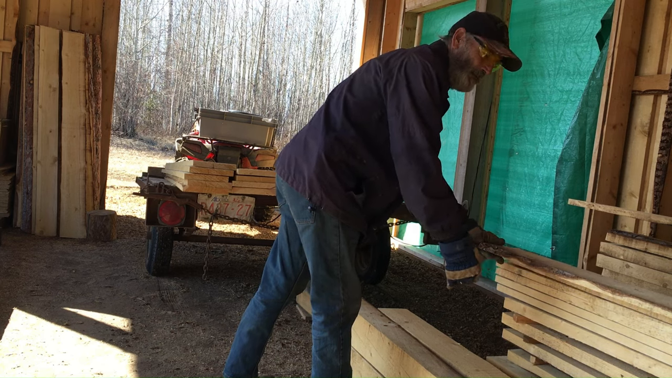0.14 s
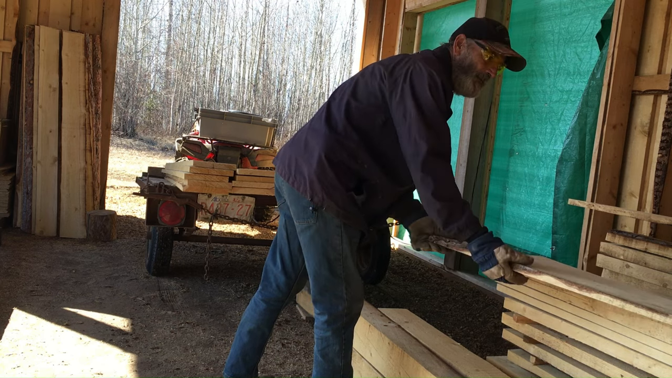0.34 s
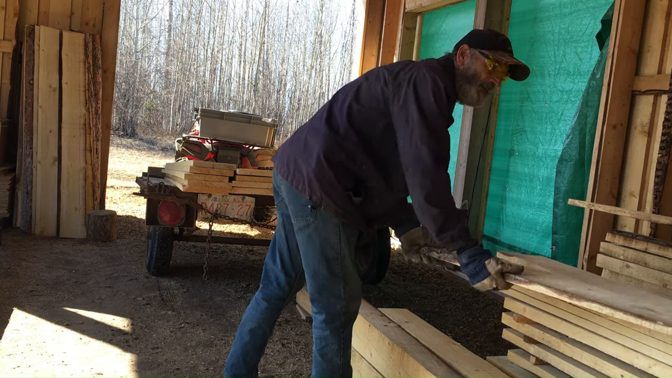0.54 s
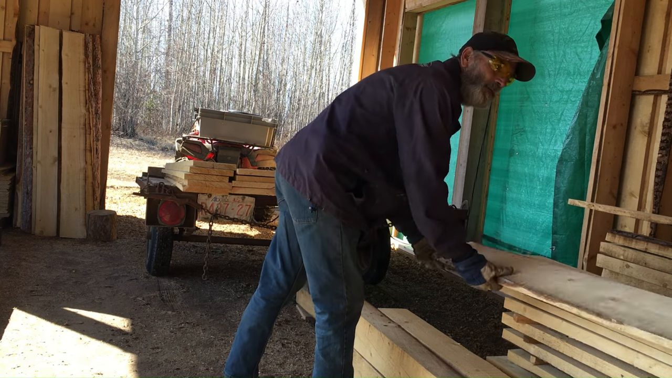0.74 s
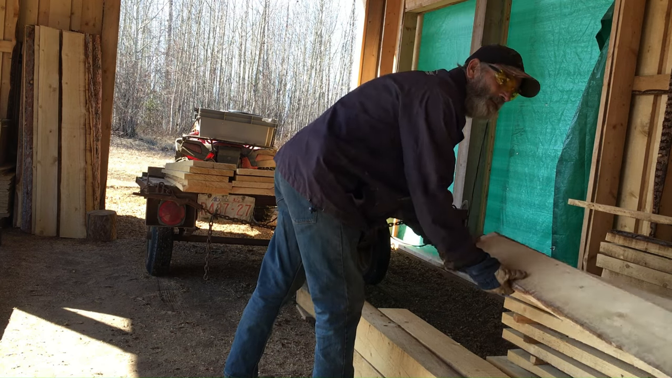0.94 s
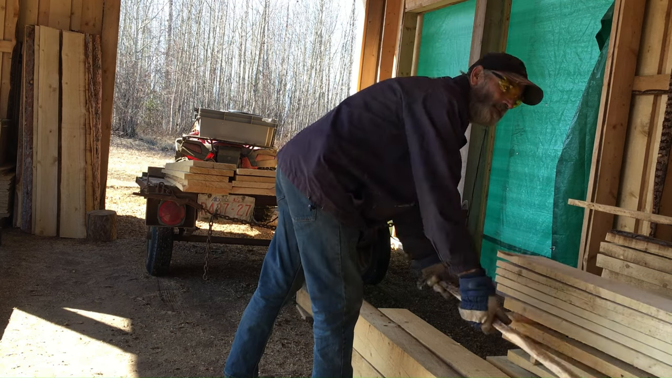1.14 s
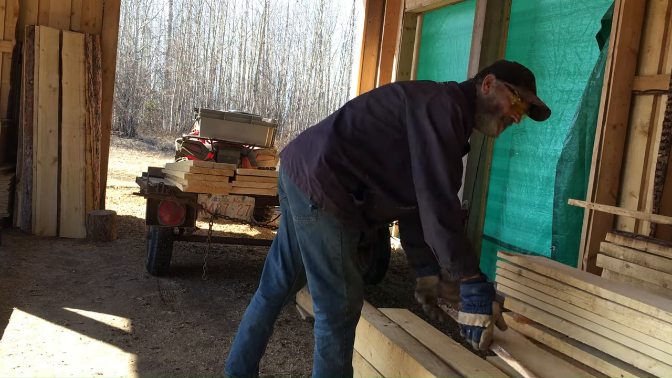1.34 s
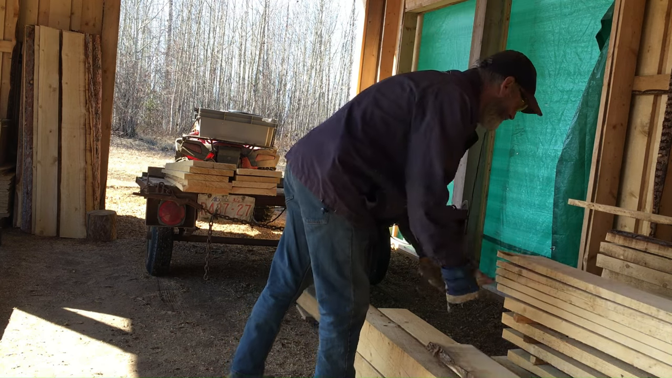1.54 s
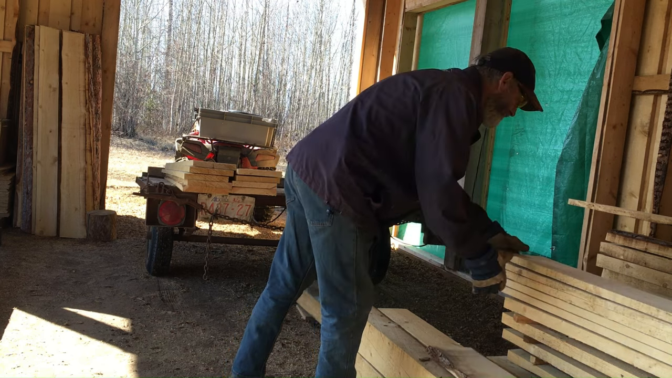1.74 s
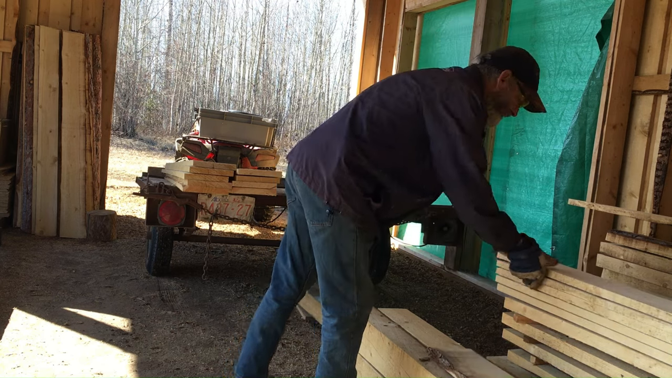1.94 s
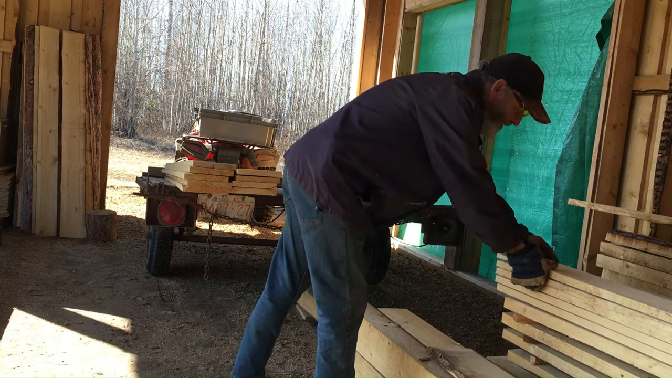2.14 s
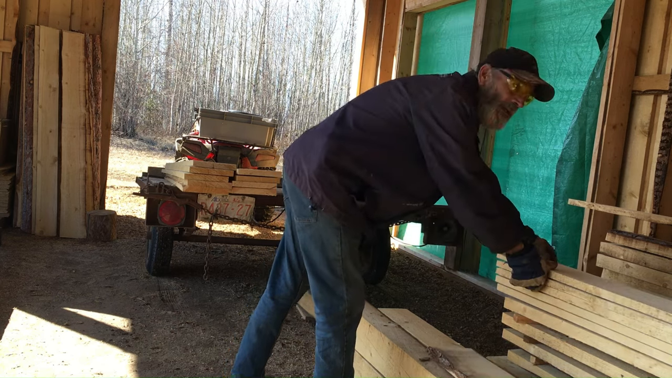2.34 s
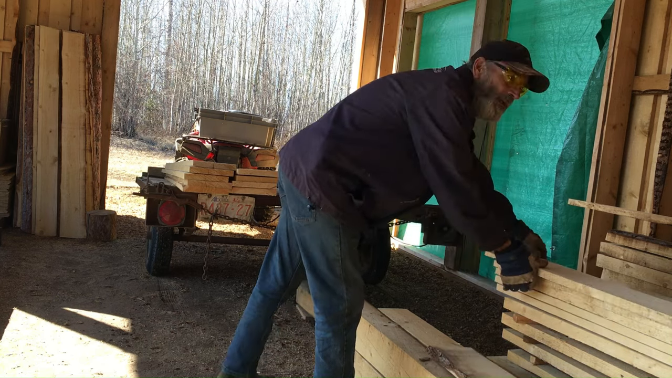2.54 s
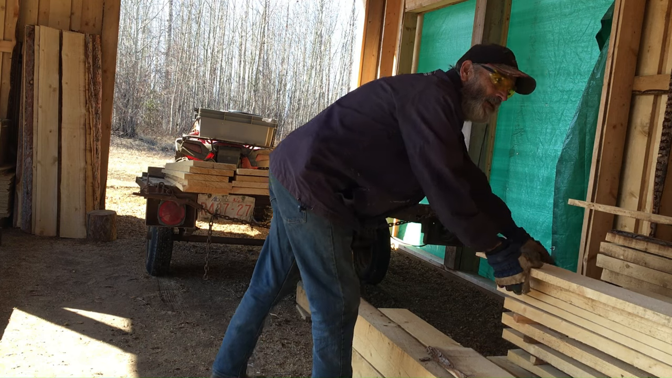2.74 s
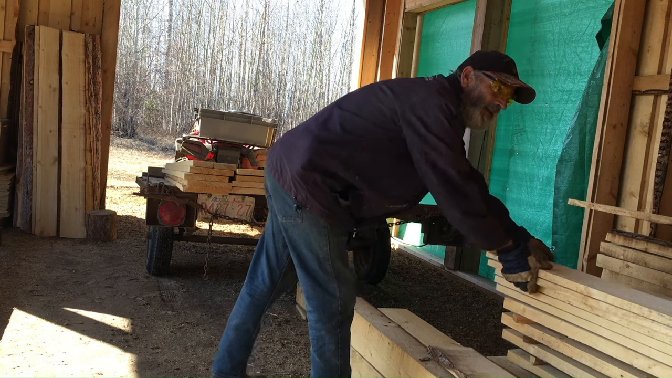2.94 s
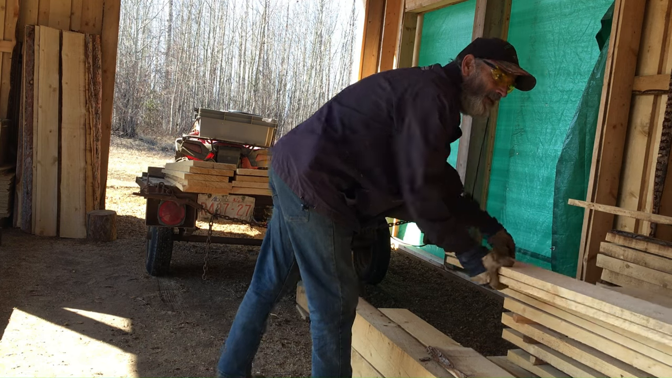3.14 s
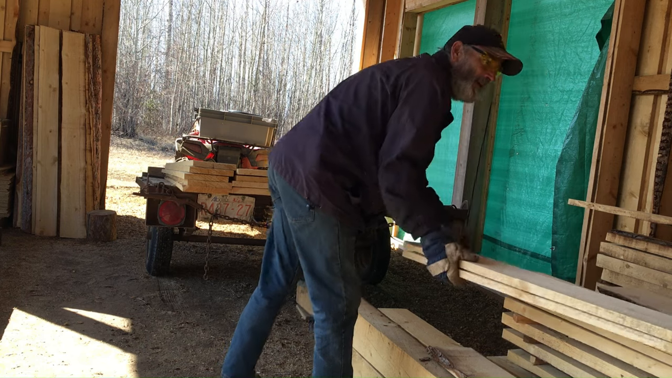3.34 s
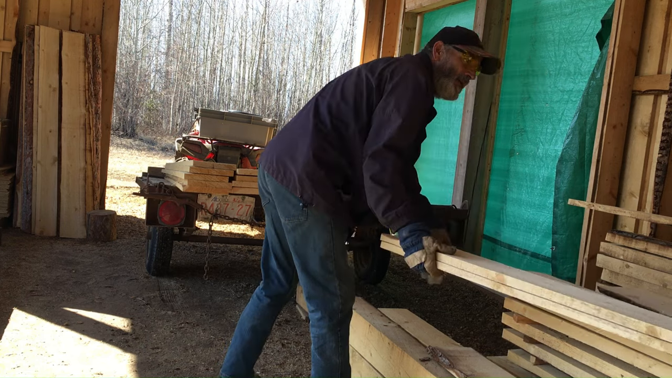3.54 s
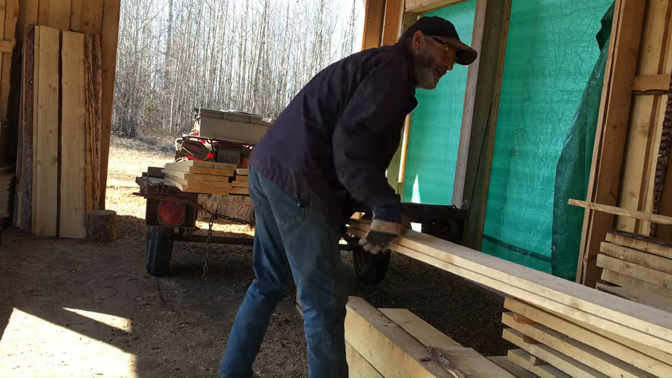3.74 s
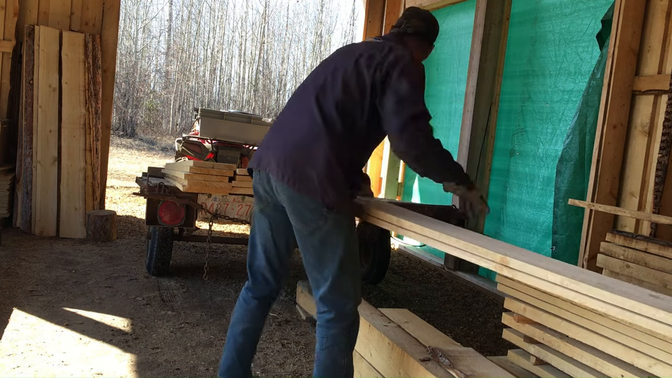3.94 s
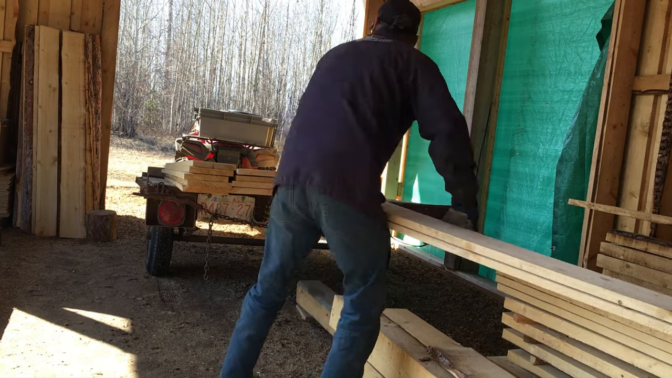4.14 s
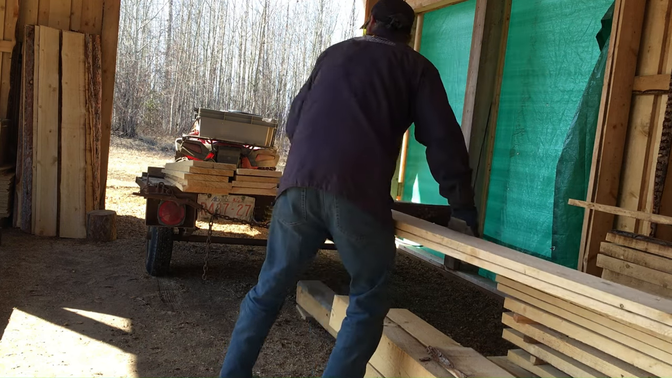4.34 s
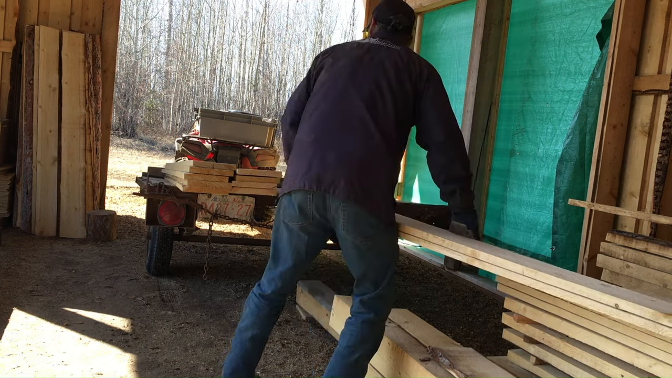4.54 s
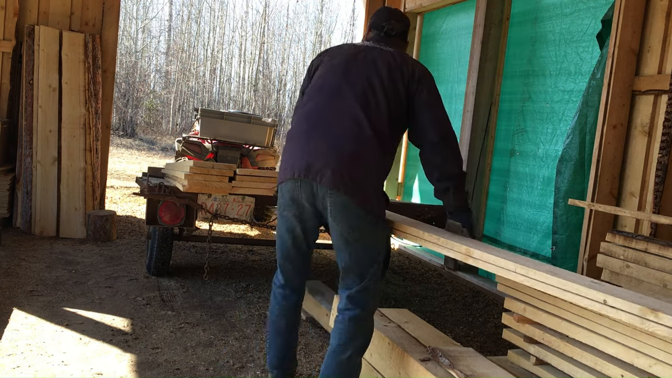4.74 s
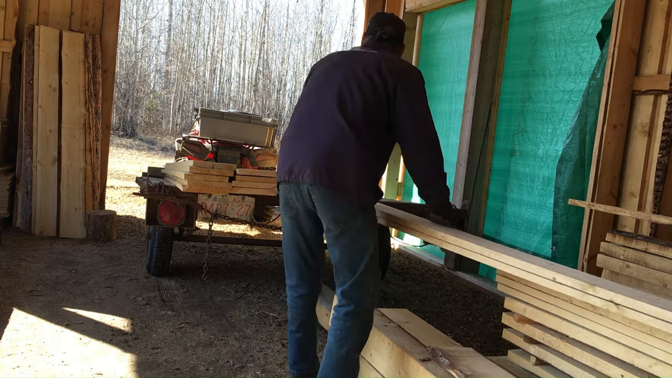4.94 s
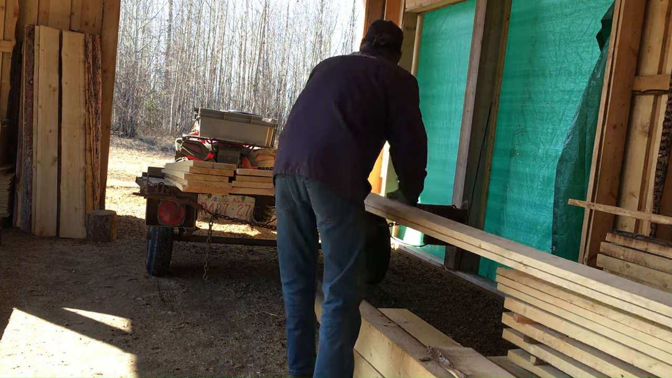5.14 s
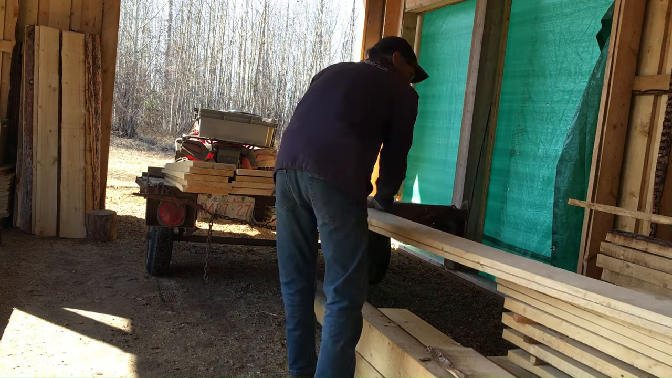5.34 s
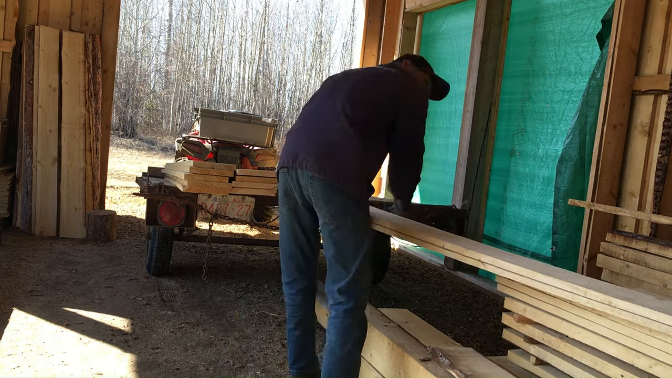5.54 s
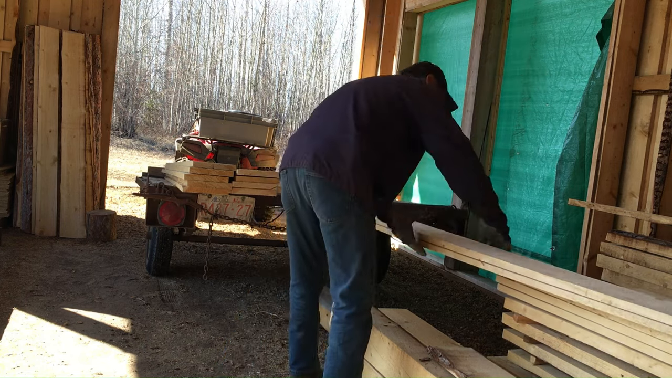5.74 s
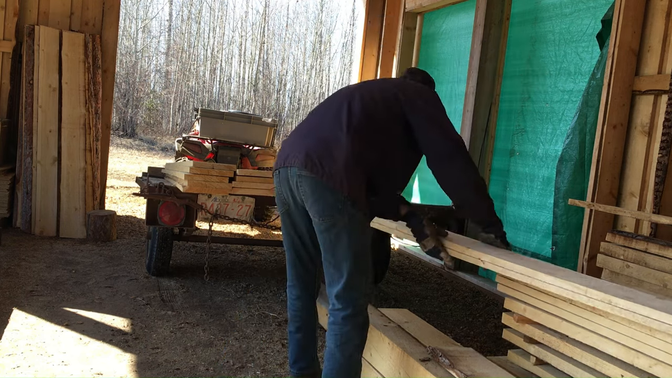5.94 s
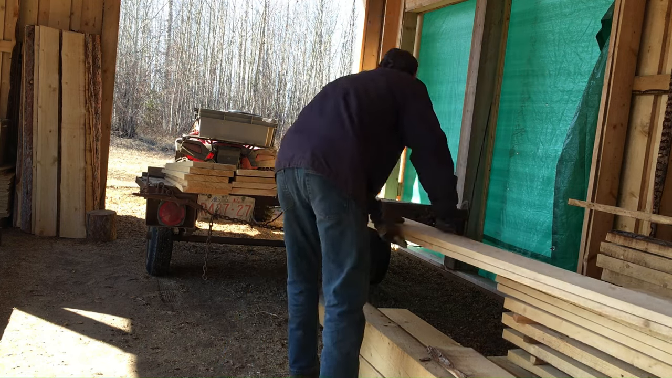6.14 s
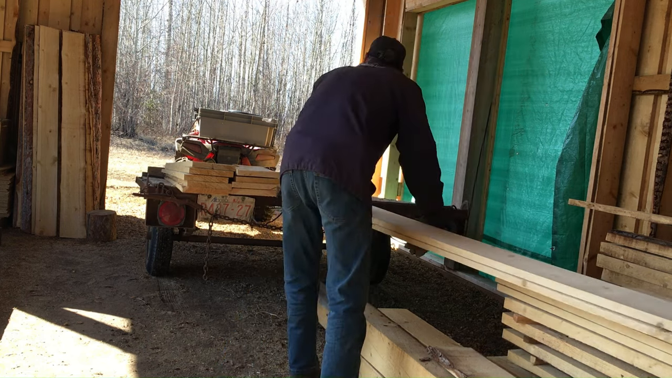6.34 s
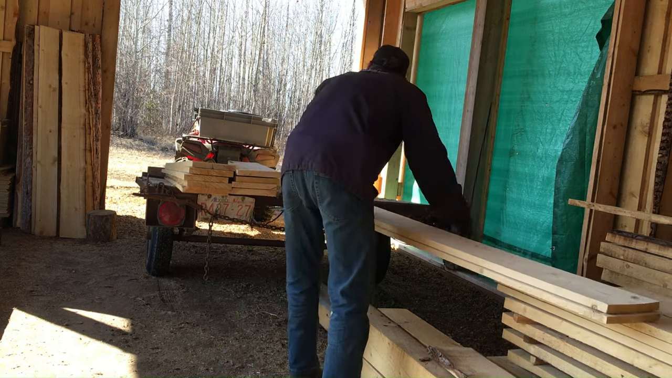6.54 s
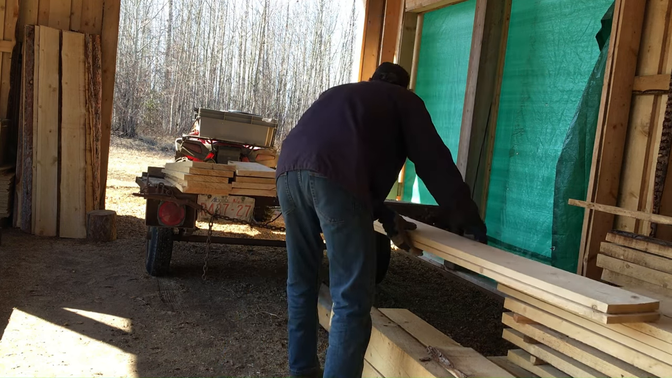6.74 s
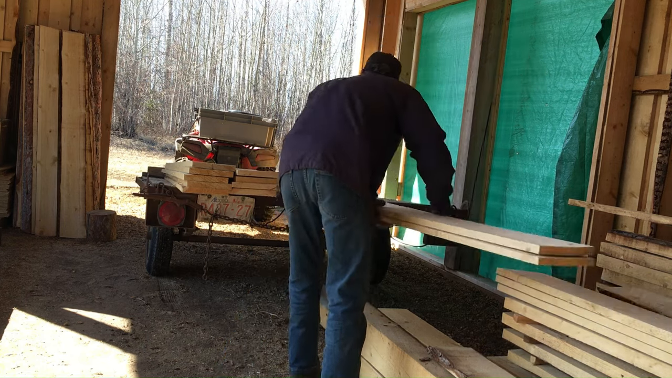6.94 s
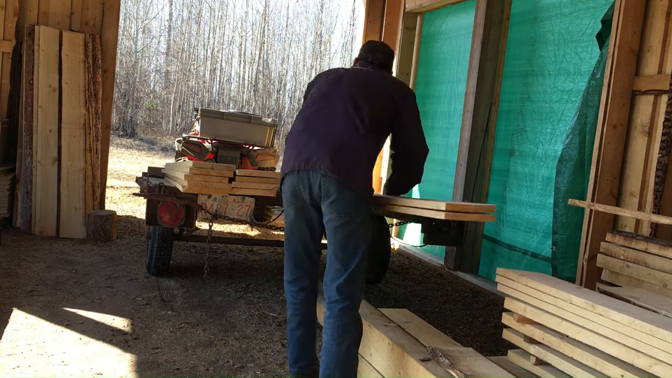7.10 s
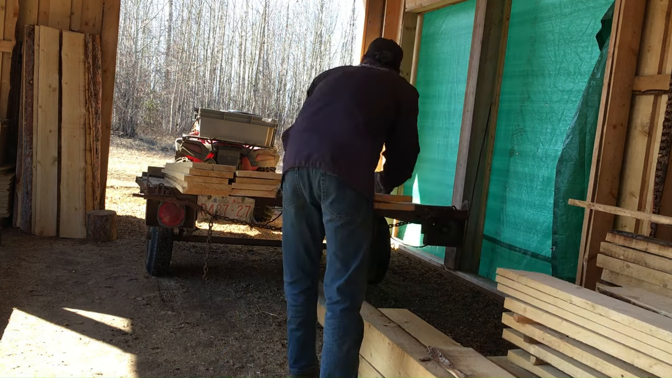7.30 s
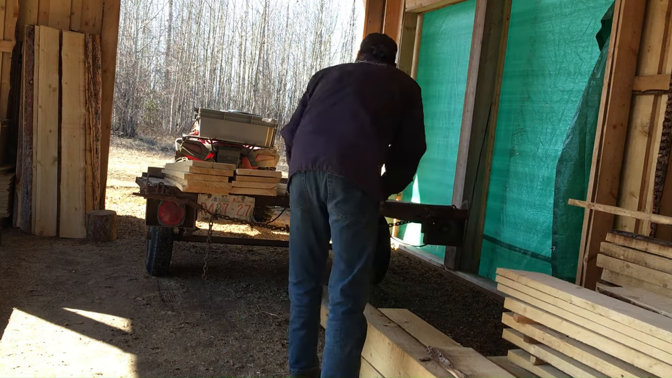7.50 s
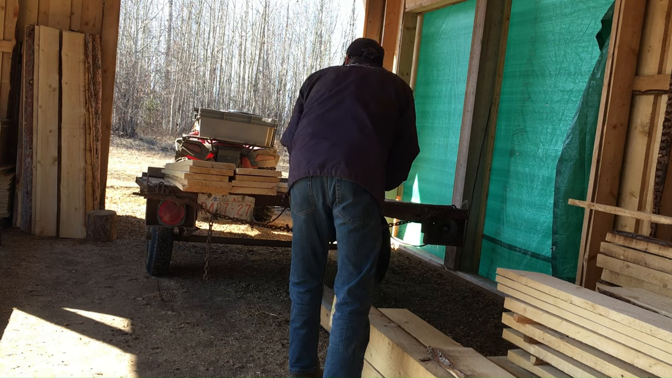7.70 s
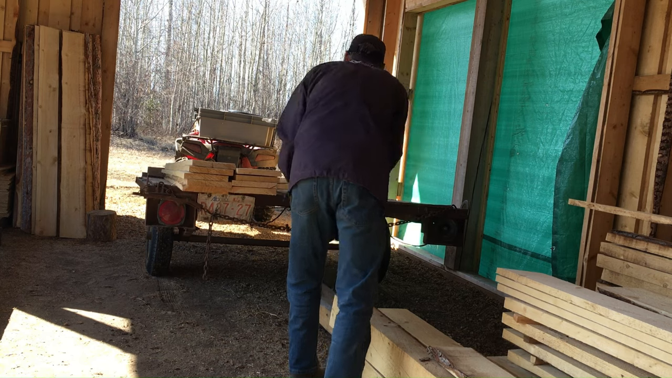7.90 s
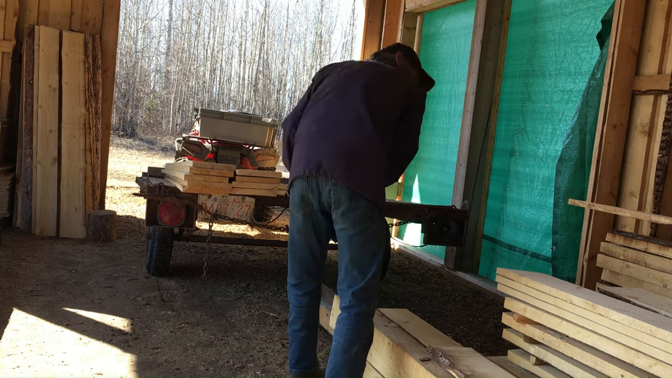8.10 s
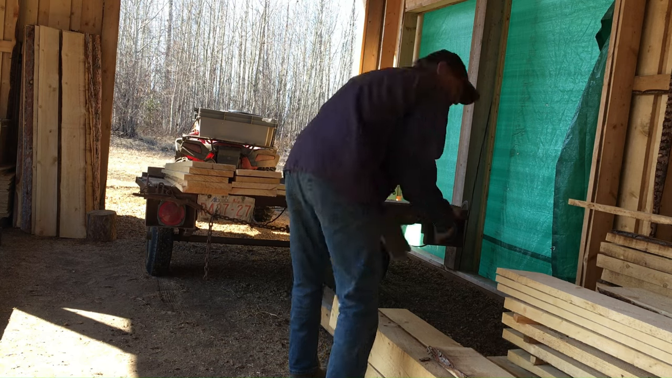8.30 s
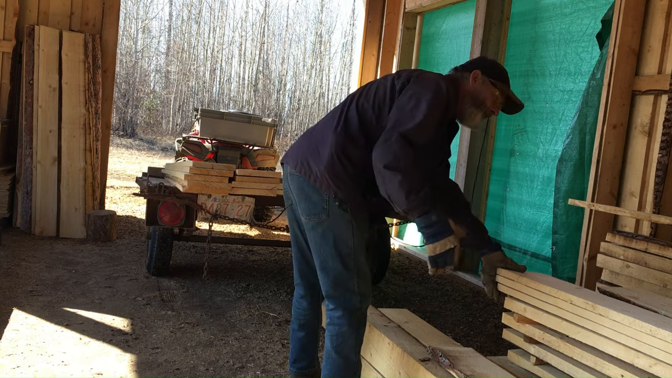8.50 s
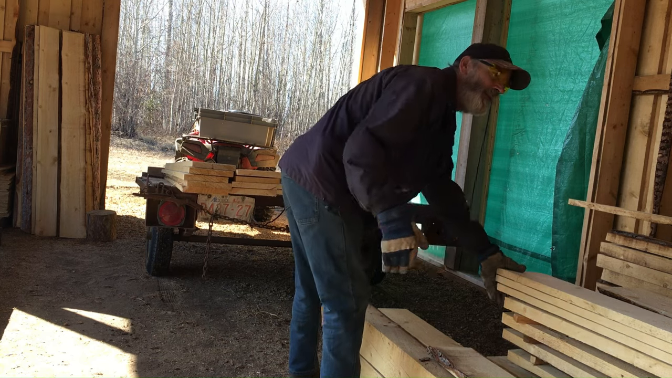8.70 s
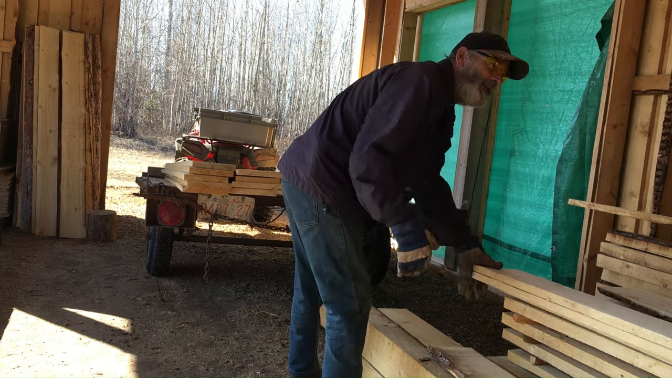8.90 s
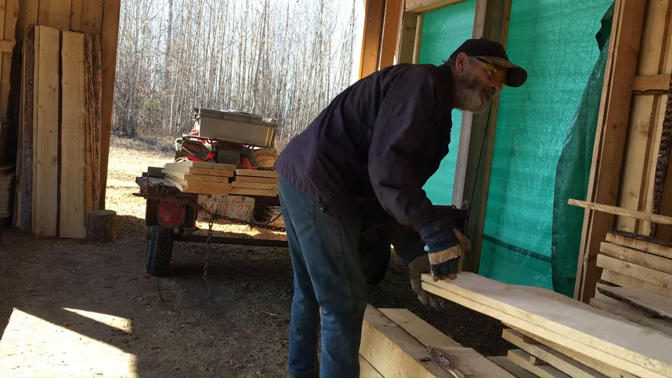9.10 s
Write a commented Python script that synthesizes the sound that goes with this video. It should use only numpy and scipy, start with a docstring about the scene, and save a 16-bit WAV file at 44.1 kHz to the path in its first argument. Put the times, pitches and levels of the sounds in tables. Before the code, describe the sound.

Close, dry sound of rough boards handled in an open wooden shed. A board rasps off a pile, rattles and slaps down with a loud crack. Gloves scuff softly, a few light knocks follow, then boards slide away with a low hollow rumble and two heavy thunks. Faint outdoor air lies beneath, with a short dull shed echo.

```python
"""Boards handled in an open shed

Rough boards are dragged off a pile, dropped on another and slid along a bench.
Every landing is a short chatter of contacts that rings the modes of the wood; sliding grain rasps
and drives the same modes, so the pile rumbles. Single modes sing or ring on as narrow wavering tones
and splinters tick as puffs of noise. Gloves and sawdust hiss as dense clicks; quiet outdoor air is
shaped noise."""
import sys
import numpy as np
from scipy import signal
from scipy.fft import rfft, irfft, next_fast_len
from scipy.io import wavfile
from scipy.ndimage import uniform_filter1d, minimum_filter1d

SR = 44100
rng = np.random.default_rng(int(sys.argv[2]) if len(sys.argv) > 2 else 0)


def unload_wav(signal):
    """Save mono or channel-first audio to the path in sys.argv[1] as 16-bit WAV at rate SR, clipped to [-1, 1]."""
    wavfile.write(
        sys.argv[1],
        SR,
        np.round(np.clip(np.atleast_2d(signal).T, -1, 1) * 32767).astype(np.int16),
    )


N = 408366

# boards landing, levels relative to each other: start_s, body level_db (loudest 20 ms),
# deep_db, pile_db, knock_db and clack_db against the body, onset_s,
# chatter length_s (the contacts have faded by 40 dB)
LANDINGS = [(0.467,-39.5,3.5,11,-9,-25,.001,0.14),(0.906,-28.5,-29,0,-6,-27,0.0074,0.16),(1.055,-20.5,-5,1,7.5,2.5,0.0014,0.092),(1.081,-20.5,-12,-7,-2.5,-17,.003,0.087),(1.186,-18,-18,-6.5,-5,-16,0.0014,0.096),(1.212,-21.5,-22,-15,-5,-25,.003,0.11),(1.284,-21,-22,-4.5,0.5,-12.5,0.0013,0.13),(1.324,-23,-20,-7,-6,-34,0.0027,0.071),(1.426,-20.5,-3,-6,-6,-20,0.0011,0.094),(1.468,-12.5,-18,0.5,3,0.5,0.0012,0.043),(1.482,-9.5,-26,5,-1.5,-10,0.0022,0.071),(1.503,-20,-21,6.5,-18,1,.003,0.05),(1.552,-26.5,-12,-7,-15,-18,0.0027,0.081),(1.75,-58,-4,21.5,10,3,.001,0.018),(2.294,-65,2,-1,1.5,5.5,.004,0.071),(2.548,-57,7.5,8.5,-0.5,9,.001,0.093),(3.353,-34.5,-4,-3,-7,-15,.012,0.056),(3.373,-36.5,6.5,8,-7,-11,0.0056,0.054),(3.395,-41,1,14.5,-12,-19,.003,0.033),(3.52,-54,-8,-13,1,2.5,.004,0.056),(5.372,-29.5,-0.5,4.5,-7.5,-10,.002,0.078),(5.395,-33,4.5,4.5,-6,-28,0.0035,0.096),(5.65,-60,13,12.5,-2.5,0,.003,0.085),(6.073,-50.5,14.5,6,-5,10.5,.012,0.22),(6.302,-39.5,-6,-11,-1,10.5,0.0026,0.32),(6.376,-39.5,-11,1,3,8,.008,0.072),(6.398,-42,13,8,1,4,.005,0.044),(7.162,-46,-6,11,-10,-4,0.0065,0.11),(7.179,-25,-16,5.5,-6,-4.5,.008,0.067),(7.224,-26,-1,9,-6,-5.5,0.0036,0.084),(7.254,-26.5,-13,4.5,-3,-5,.004,0.044),(7.369,-30.5,3,5.5,-18,-6.5,.006,0.062),(7.454,-40.5,15,3,-18,-23,.004,0.088),(7.717,-41,9,7,-3,-6,.002,0.044),(7.835,-32.5,8,0,-4,-5.5,0.0076,0.093),(7.895,-18.5,-2,6,-13.5,-20.5,0.0065,0.064),(7.916,-17.5,-13,-0.5,-7.5,-27,0.0043,0.083),(8.02,-36.5,5,11,2,-4,.004,0.056),(8.057,-38.5,13,17,-16,-29,0.0033,0.062),(8.137,-46,7,0.5,-2.5,-17,.001,0.092),(8.901,-59,-15,-1.5,15.5,14,0.0011,0.073)]
# modes of boards and pile: pitch_hz, level_db (relative), t60_s (before the limit on cycles)
WOOD_MODES = [(52.7, -12, 0.92), (73.2, 0.5, 0.28), (104.5, -0.5, 0.26), (129.6, -4.5, 0.12),
              (150, 1.5, 0.17), (180, 1.5, 0.16), (211.9, 5.5, 0.077), (278.6, -6, 0.16),
              (291, -6.5, 0.067), (340, -4, 0.25), (400, -7.5, 0.16), (466.7, 1.5, 0.035),
              (560, -3.5, 0.054), (649, 4.5, 0.021), (704.5, -12.5, 0.18), (704, -1, 0.087),
              (953, -6.5, 0.16), (1048, -6, .05), (1062, -27, .05), (1250, -8.5, 0.077),
              (1320, -7.5, 0.087), (1480, 3.5, 0.014), (1834, -12.5, .04), (1850, -12.5, .04),
              (1870, -22.5, 0.023), (2194, -4, .03), (2700, -8.5, 0.049), (2790, -8.5, .03)]
# edges between the parts of the wood, from deep thump up to crack: edge_hz
PART_EDGES_HZ = [28, 110, 300, 650, 1300, 2200, 4400]


def from_db(db):
    """dB to gain."""
    return 10 ** (np.asarray(db) / 20)


def rms_one(x):
    """Scale to rms 1."""
    return x / np.sqrt(np.mean(x ** 2) + 1e-20)


def drift(rate_hz):
    """Slow random wander of rms 1: noise through two equal lowpasses at a 40th of the sample rate."""
    step = 40
    r = np.exp(-2 * np.pi * step * rate_hz / SR)
    noise = rng.standard_normal(N // step + 2002)
    slow = signal.lfilter([1], [1, -2 * r, r * r], noise)[2000:]  # drop the settling
    return np.interp(np.arange(N) / step, np.arange(len(slow)), rms_one(slow))


def grains(count, per_s, spread_db):
    """Random clicks of uneven size and sign, like fibres catching."""
    sizes = from_db(spread_db * np.minimum(rng.exponential(1, count), 5))
    sizes *= rng.choice([-1, 1], count)
    return sizes * (rng.random(count) < per_s / SR)


def ring(clicks, hz, t60_s):
    """Damped resonator: a unit click sets a sine of height 1 ringing."""
    r, w = from_db(-60 / (t60_s * SR)), 2 * np.pi * hz / SR
    return signal.lfilter([0, np.sin(w)], [1, -2 * r * np.cos(w), r * r], clicks + 1e-18)


def mode(drive, k):
    """Mode k of the wood, damped so that it falls 60 dB within 60 cycles at most."""
    most_cycles = 60
    hz, level_db, t60_s = WOOD_MODES[k]
    return from_db(level_db) * (-1) ** k * ring(drive, hz, min(t60_s, most_cycles / hz))


def bandpass(x, low_hz, high_hz, order=2):
    """Butterworth band between two frequencies."""
    sos = signal.butter(order, [low_hz, high_hz], "band", fs=SR, output="sos")
    return signal.sosfilt(sos, x)


def coloured(x, spectrum, patchy_db):
    """Half-octave bands, each with its level and its own flicker; rms 1."""
    out, edges_hz = 0, 25 * 2 ** np.arange(0, 9.6, .5)
    hz, level_db = np.transpose(spectrum)
    for k, (low, high) in enumerate(zip(edges_hz, edges_hz[1:])):
        band_db = np.interp(np.log(low * high) / 2, np.log(hz), level_db)
        gain = from_db(band_db + patchy_db * drift(22))
        out = out + (-1) ** k * gain * bandpass(x, low, high)
    return rms_one(out)


def chatters():
    """Each landing is a firm first contact and a flurry of smaller ones that holds, then dies away."""
    contacts_per_s, contact_spread_db = 2300, 3
    age_s = np.arange(SR // 3) / SR
    bursts = np.array([grains(len(age_s), contacts_per_s, contact_spread_db) for _ in LANDINGS])
    bursts[:, 0] = 4.7
    bursts *= 1 + 2.5 * np.exp(-age_s / .004)  # the first few ms hit harder
    length_s = np.array(LANDINGS)[:, -1:]
    return age_s, 1e-18 + bursts * from_db(-40 * (age_s / length_s) ** 2)


def landings():
    """Each landing shares its force among low and high parts of the wood; the low parts swell later."""
    # damped modes against ringing ones, one per part: level_db
    clatter_db = [34.1, 37.7, 36.5, 32.05, 31.5, 28.7]
    landing_db, swell_cycles = -6, 0.57
    crack_db = -5.5  # the crack lies just under the clack
    treble_fade_db = 4  # extra fade per part above the body: later contacts are duller

    table = np.array(LANDINGS)
    age_s, bursts = chatters()
    start_s, body_db, deep_db, pile_db, knock_db, clack_db, onset_s, length_s = table.T
    onset_s, length_s = onset_s[:, None], length_s[:, None]
    offsets_db = [deep_db, pile_db, 0 * body_db, knock_db, clack_db, clack_db + crack_db]
    parts_db = body_db + np.array(offsets_db)

    part_of = np.searchsorted(PART_EDGES_HZ, np.array(WOOD_MODES)[:, 0]) - 1
    # every landing excites each mode a little differently
    strengths = from_db(rng.normal(0, 2.6, (len(LANDINGS), len(WOOD_MODES))))
    sounds = 0
    for part, (low_hz, high_hz) in enumerate(zip(PART_EDGES_HZ, PART_EDGES_HZ[1:])):
        modes_here = np.flatnonzero(part_of == part)
        rings = sum(strengths[:, [k]] * mode(bursts, k) for k in modes_here)
        # the many close, damped modes in between pass the contacts on as a dense clatter
        clatter = bandpass(bursts, low_hz, high_hz)
        swell = 1 - np.exp(-age_s / (swell_cycles / high_hz + onset_s))
        sound = (rings + from_db(clatter_db[part]) * clatter) * swell
        sound *= from_db(-treble_fade_db * max(part - 2, 0) * np.minimum(age_s / length_s, 1.5))
        power = uniform_filter1d(sound ** 2, size=SR // 50)
        strongest = np.sqrt(power.max(axis=1, keepdims=True))
        sounds = sounds + from_db(parts_db[part, :, None]) * sound / strongest

    out = np.zeros(N + len(age_s))
    fade_out = signal.windows.tukey(2 * len(age_s), .2)[len(age_s):]
    for s, sound in zip(start_s, sounds):
        at = round(s * SR)
        out[at:at + len(age_s)] += sound * fade_out
    return from_db(landing_db) * out[:N]


def rubbing():
    """Every rub and scuff rises, holds and falls; their powers add up to hiss, rasp and rumble in dB."""
    # boards dragged or rocking, the rough burst of a hard landing, and the pile rumbling on afterwards,
    # levels relative: start_s, rise_s, hold_s, fall_s, sawdust hiss_db, wood rasp_db, pile rumble_db
    rubs = [(0.202, .19, 0.022, 0.16, -48.5, -55.5, -55.5), (0.545, 0.14, 0.26, .1, -48, -49.5, -47),
            (0.817, 0.15, 0.047, 0.063, -39.5, -34, -37.5), (0.993, 0.025, 0.083, 0.079, -45.5, -38.5, -42),
            (1.346, 0.051, 0.011, .03, -46, -44, -40), (1.462, 0.022, .03, .04, -56, -16.5, -36),
            (1.55, 0.063, 0.16, 0.36, -95, -65, -49), (2.98, .14, 0.27, 0.19, -50.5, -50.5, -53),
            (3.46, 0.33, .16, .33, -46, -40.5, -54), (4.67, .22, 0.4, 0.13, -47.5, -49.5, -58),
            (5.381, 0.053, .14, 0.072, -61, -55.5, -41.5), (5.55, 0.044, 0.08, 0.23, -81, -76, -56),
            (6.022, 0.097, 0.11, 0.091, -45, -43.5, -60), (6.177, 0.11, 0.14, 0.22, -43, -39, -35),
            (6.52, 0.068, 0.071, 0.23, -50, -54.5, -60), (6.8, 0.21, 0.23, .1, -49.5, -43, -35),
            (7.109, 0.094, 0.25, 0.21, -50.5, -43.5, -22.5), (7.669, 0.1, 0.16, 0.065, -52, -48, -24.5),
            (7.954, .03, 0.17, 0.31, -66, -59.5, -46), (8.101, 0.054, .1, 0.84, -74, -71.5, -51.5),
            (8.841, 0.08, .24, .1, -48.5, -49.5, -52), (9.15, .05, .1, .1, -78, -64, -56)]
    # gloves scuffing over the wood: loudest_s (moment), length_s, hiss_db (relative)
    scuffs = [(0.214, 0.1, -57), (0.59, 0.15, -52), (0.334, 0.073, -55), (0.947, 0.078, -36),
              (1.21, 0.1, -57), (1.273, 0.14, -55), (1.835, 0.12, -55), (2.091, 1, -61.5),
              (2.306, 0.15, -55.5), (2.481, 0.18, -60), (2.605, 0.24, -46.5), (2.791, 0.48, -56.5),
              (2.954, 0.21, -47.5), (3.539, 0.25, -49), (4.101, 0.28, -49), (4.307, 0.11, -54),
              (4.25, .3, -61), (4.465, 0.6, -62.5), (4.631, 0.28, -56), (5.12, 0.61, -43), (5.45, 0.1, -54),
              (5.555, 0.099, -52), (5.697, 0.15, -55), (5.886, 0.37, -52.5), (6.659, 0.079, -66),
              (7.11, 0.18, -49), (7.384, 0.17, -46), (8.263, 0.32, -61), (8.43, 0.45, -69),
              (8.574, 0.12, -54.5), (8.652, 0.074, -51.5), (8.735, 0.18, -61), (9.129, 0.096, -39.5)]
    rise_share = 0.39  # of a scuff's length
    scuff_rasp_db, scuff_rumble_db = -6.5, -7.5  # against its hiss
    depth_db, curve = 24, 1.35  # drop at either end of a rub, and how rounded the swell is

    scuff_rubs = []
    for s, length, db in scuffs:
        rise, fall = rise_share * length, (1 - rise_share) * length
        scuff_rubs.append((s - rise, rise, 0, fall, db, db + scuff_rasp_db, db + scuff_rumble_db))
    t, power = np.arange(0, N, 40) / SR, 1e-10
    for start, rise, hold, fall, *levels_db in rubs + scuff_rubs:
        full = start + rise
        # 0 while the rub is full, 1 at its ends
        away = np.maximum(0, np.maximum((full - t) / rise, (t - full - hold) / fall))
        power = power + from_db(np.array(levels_db)[:, None] - depth_db * away ** curve) ** 2
    return [np.interp(np.arange(N) / SR, t, 10 * np.log10(p)) for p in power]


def sliding(rasp_db, rumble_db):
    """Grain catching on grain rasps, and drives the same modes: the pile rumbles, the board hums along."""
    # colour of the rasp: pitch_hz, level_db (per Hz, relative)
    rasp_spectrum = [(120, -14), (200, 7.5), (307, 1.5), (374, -2.5), (457, 1), (866, 3), (1220, 1),
                     (4030, -12), (4850, -41.5), (6000, -33), (7800, -42.5), (13200, -120)]
    rumble_ring_db, rasp_ring_db = -38.5, -61  # drive of the pile's and the board's modes
    grain = rms_one(grains(N, 3000, 2.83))
    out = from_db(rasp_db) * coloured(grain, rasp_spectrum, patchy_db=1.6)
    for k, (hz, _, _) in enumerate(WOOD_MODES):
        in_pile = hz < PART_EDGES_HZ[2]
        rub_db = rumble_db + rumble_ring_db if in_pile else rasp_db + rasp_ring_db
        out += mode(from_db(rub_db + 4.0 * drift(1.7)) * grain, k)
    return out


def singing():
    """Single modes sing or ring on as narrow wavering tones, after landings or while boards slide."""
    # tones, many gliding in pitch: start_s, end_s, first_hz, last_hz, width_hz,
    # level_db (rms before the swell and fade)
    tones = [(0.617, 0.912, 985, 947, 150, -49.5), (0.904, 1.034, 560, 553, 110, -33),
             (1.55, 2.225, 178, 176.8, 13, -53.5), (1.8, 2.309, 728, 670, 37, -68.5),
             (3.683, 3.98, 378, 349, 12, -51.5), (4.796, 5.112, 379, 400, 7.8, -54),
             (5.078, 5.372, 400, 420, 13, -61.5), (4.859, 5.16, 1207, 1250, 53, -51),
             (5.122, 5.376, 1196, 1290, 180, -42.5), (6.04, 6.236, 193.2, 180, 8.1, -42.5),
             (6.36, 6.523, 209, 180, 10, -47), (6.202, 6.547, 975, 1042, 35, -49),
             (6.92, 7.11, 197.4, 186, 6.8, -41.5), (7.2, 7.345, 198.9, 120.3, 9.5, -22.5),
             (7.348, 7.576, 340, 322, 16, -40), (7.42, 7.634, 130.9, 113.3, 17, -35),
             (7.717, 7.91, 192.7, 187, 75, -38.5), (7.95, 8.153, 150, 138, 8.8, -38),
             (7.98, 8.141, 340, 342.4, 31, -44), (8.131, 8.27, 340, 327, 40, -55.5),
             (7.128, 7.322, 331, 400, 60, -35.5), (3.36, 3.48, 164.7, 150, 31, -40.5)]
    out = np.zeros(N)
    for start, end, first_hz, last_hz, width_hz, db in tones:
        at, count = round(start * SR), round((end - start) * SR)
        r = np.exp(-np.pi * width_hz / SR)
        # lowpassed noise on both quadratures wanders in height and phase
        wander = signal.lfilter([1], [1, -r], rng.standard_normal((2, SR)))
        wander = wander[:, SR // 4:SR // 4 + count]
        phase = 2 * np.pi * np.cumsum(np.linspace(first_hz, last_hz, count)) / SR
        tone = rms_one(wander[0] * np.cos(phase) + wander[1] * np.sin(phase))
        out[at:at + count] += from_db(db) * signal.windows.tukey(count, .6) * tone
    return out


def ticks():
    """Splinters and grit tick and scuff drily: puffs of noise that start at once and stop soon."""
    # puffs: start_s, level_db (relative), length_s (faded by 40 dB)
    puffs = [(0.5646, -25.5, 0.016), (1.054, -26, 0.025), (1.0974, -21.5, 0.022), (1.304, -35, 0.013),
             (1.458, -37, 0.017), (2.359, -38.5, 0.0096), (2.5491, -39, 0.036), (2.9, -44, 0.039),
             (4.1, -47.5, 0.025), (6.236, -35, 0.014), (6.307, -44, 0.025), (6.418, -32, 0.022),
             (6.595, -38, 0.031), (7.176, -27.5, 0.058), (7.234, -28.5, 0.028), (7.838, -39.5, 0.025),
             (8.023, -49.5, 0.018), (8.546, -43.5, 0.053), (8.595, -42.5, 0.015), (8.649, -40, 0.023),
             (8.829, -46, .01), (8.714, -48, 0.039), (8.905, -34.5, 0.043), (9.109, -30, 0.018)]
    out, age_s = np.zeros(N + SR // 5), np.arange(SR // 5) / SR
    for s, db, length in puffs:
        at = round(s * SR)
        fade_db = -40 * (age_s / length) ** 2.2
        out[at:at + len(age_s)] += from_db(db - 6 + fade_db) * rng.standard_normal(len(age_s))
    return bandpass(out[:N], 800, 6000, order=1)


def glove_and_sawdust_hiss(hiss_db):
    """Gloves and sawdust hiss: very dense small clicks, coloured and flickering, follow the rubbing."""
    # colour of the hiss: pitch_hz, level_db (per Hz, relative)
    hiss_spectrum = [(410, -61.5), (700, -3.5), (3240, -3.5), (4990, -9), (6070, 3), (7790, -11.5),
                     (12000, -11), (16000, -19.5)]
    return from_db(hiss_db + 1.5) * coloured(grains(N, 14000, 2.6), hiss_spectrum, patchy_db=3.0)


def shed(x):
    """Eight feedback delays between the walls, duller on every round."""
    t60_s, wall_cut_hz = 0.36, 1700
    size = next_fast_len(N + SR)
    hz = np.arange(size // 2 + 1) * SR / size
    echo = 0
    for k, lag_s in enumerate(rng.uniform(0.016, .05, 8)):
        wall = from_db(-60 * lag_s / t60_s) / (1 + 1j * hz / wall_cut_hz)
        loop = wall * np.exp(-2j * np.pi * hz * lag_s)
        echo = echo + (-1) ** k * loop / (1 - loop)
    return irfft(rfft(x, size) * echo, size)[:N]


def outdoor_air():
    """Quiet air: steady noise, coloured and flickering band by band."""
    # colour of the air: pitch_hz, level_db (per Hz, relative)
    air_spectrum = [(15, -35), (25, 10), (70, 10.5), (180, -2.5), (463, -11), (1290, -21), (4870, -19.5),
                    (13600, -17), (16000, -22)]
    air_db = -62.5  # rms
    return from_db(air_db) * coloured(rng.standard_normal(N), air_spectrum, patchy_db=3)


def scene():
    """Wood with its shed echo, and dry hiss, over quiet outdoor air."""
    shed_db = -18
    hiss_db, rasp_db, rumble_db = rubbing()
    boards = landings() + sliding(rasp_db, rumble_db) + singing() + ticks()
    echo = from_db(shed_db) * shed(boards)
    return (boards + echo + glove_and_sawdust_hiss(hiss_db) + outdoor_air())[None]


def record(dry):
    """The housing cuts a few dips in the treble, a limiter holds the peaks, the top is cut."""
    # dips of the microphone housing: pitch_hz, width_hz, level_db
    dips = [(4830, 1800, -7), (7660, 1900, -4.5), (10500, 930, -6.5)]
    ceiling, cutoff_hz = .72, 16600  # the top is 70 dB down from the cutoff up
    x = dry
    for hz, width_hz, db in dips:
        b, a = signal.iirpeak(hz, hz / width_hz, fs=SR)
        x = x - (1 - from_db(db)) * signal.lfilter(b, a, x)
    headroom = minimum_filter1d(np.minimum(1, ceiling / (np.abs(x) + 1e-9)), size=301)
    x = x * uniform_filter1d(headroom, size=151)
    return signal.sosfilt(signal.cheby2(14, 70, cutoff_hz, fs=SR, output="sos"), x)


dry = scene()
out = record(dry)
unload_wav(out)
```